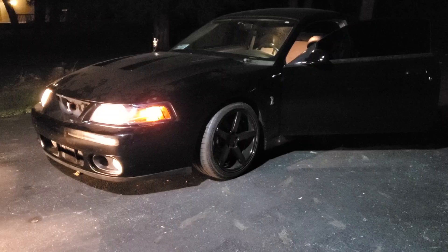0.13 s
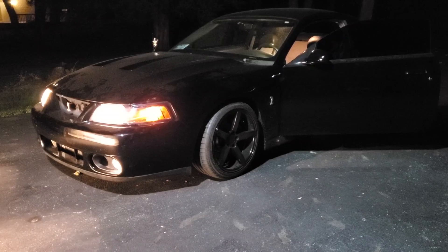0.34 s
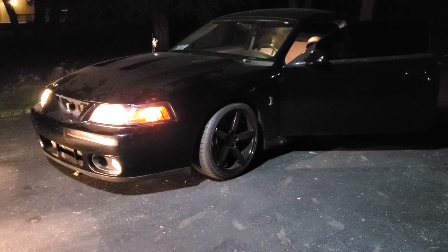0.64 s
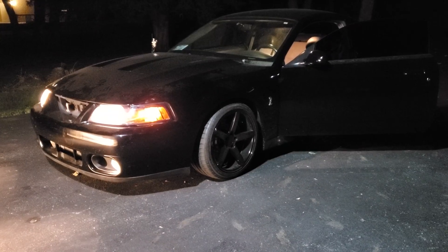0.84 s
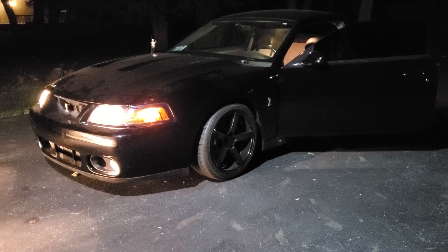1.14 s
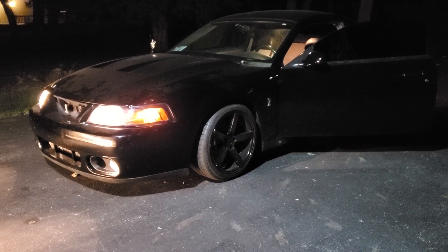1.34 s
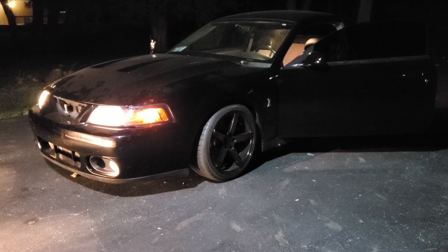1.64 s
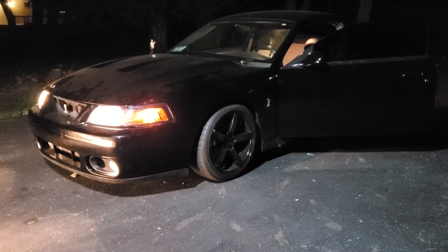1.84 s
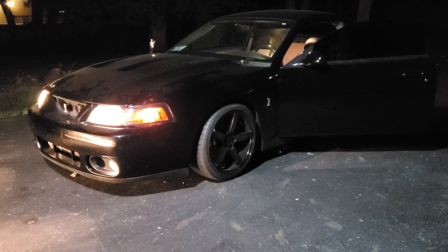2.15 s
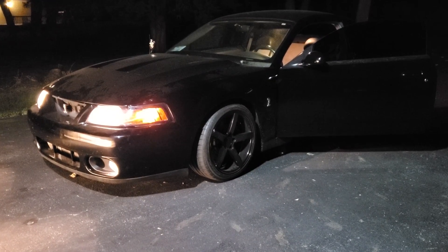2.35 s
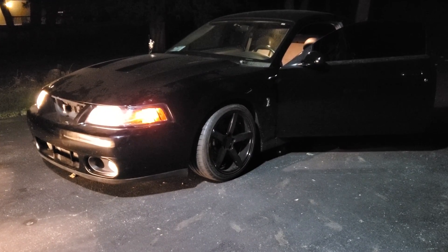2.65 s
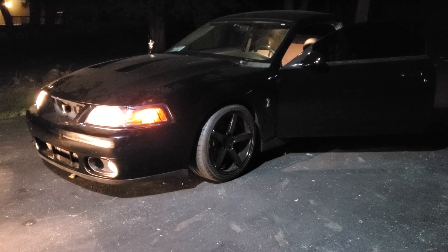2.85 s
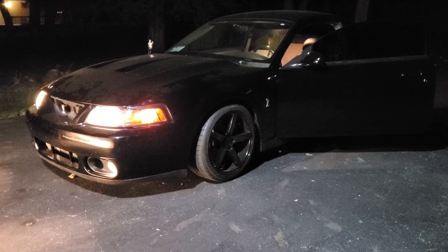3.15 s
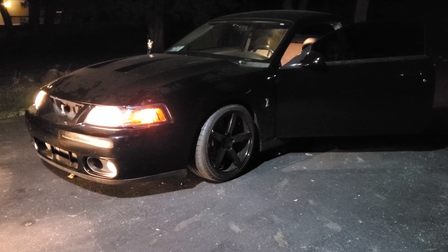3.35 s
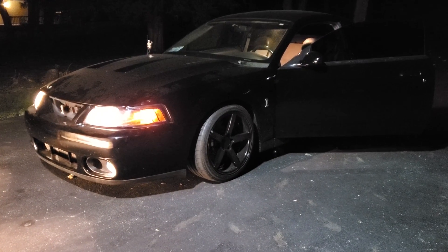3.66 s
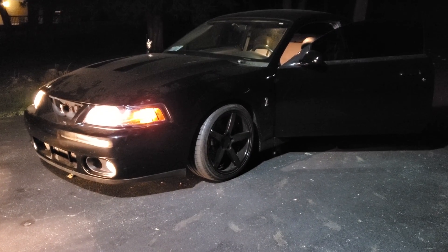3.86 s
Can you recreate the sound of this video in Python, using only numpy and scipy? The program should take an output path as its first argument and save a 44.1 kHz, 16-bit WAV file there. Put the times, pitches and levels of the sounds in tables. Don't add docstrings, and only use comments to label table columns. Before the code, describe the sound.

A car engine idles with a strong low hum, starting quiet and swelling to a steady level.

```python
import sys
import numpy as np
from scipy import signal
from scipy.fft import rfft, irfft
from scipy.io import wavfile
from scipy.ndimage import uniform_filter1d

SR = 44100
rng = np.random.default_rng(int(sys.argv[2]) if len(sys.argv) > 2 else 0)


def level_to_linear(level):
    exponent = np.asarray(level, float) / 20
    return 10 ** exponent


def master(y):
    cut = np.clip(np.atleast_2d(y).T, -1, 1)
    pcm = np.round(cut * 32767)
    wavfile.write(sys.argv[1], SR, pcm.astype(np.int16))


N = 176400
TIME_S = np.arange(N) / SR
BIN_HZ = np.arange(N // 2 + 1) * SR / N


def rms_one(x):
    return x / np.sqrt(np.mean(x ** 2) + 1e-20)


def in_time(rows):
    s, *columns = np.transpose(rows)
    return [np.interp(TIME_S, s, column) for column in columns]


def at_hz(points):
    hz, value = np.transpose(points)
    return np.interp(np.log(BIN_HZ + 1), np.log(hz), value)


def drift(rate_hz):
    pole = np.exp(-80 * np.pi * rate_hz / SR)
    draws = rng.standard_normal(N // 40 + 2002)
    slow = signal.lfilter([1], [1, -2 * pole, pole * pole], draws)[2000:]
    return np.interp(np.arange(N) / 40, np.arange(len(slow)), rms_one(slow))


def noise(gain):
    # f/Hz, correlation (0-1)
    likeness = [(60, .99), (290, 0.92), (640, 0.67), (1410, 0.43), (3100, 0.45), (6000, 0), (15000, 0.3)]
    mid, side = rfft(rng.standard_normal((2, N)))
    alike = np.clip(at_hz(likeness), 0, 1)
    shared = np.sqrt(1 + alike) * mid
    apart = np.sqrt(1 - alike) * side * [[1], [-1]]
    return rms_one(irfft(gain * (shared + apart), N))


def band(hz, width_hz, order):
    return (1 + ((BIN_HZ - hz) / (.5 * width_hz)) ** 2) ** (-.5 * order)


def closed(points):
    return level_to_linear(at_hz(points)) * (BIN_HZ > points[0][0]) * (BIN_HZ < points[-1][0])


def cycles():
    # t/s, lead/cycles
    lead = [(0, -.008), (.45, -.014), (.9, -.064), (1.05, -.058), (1.5, -.011), (1.8, .004), (2.1, .004),
            (2.5, -.005), (3.4, .003), (4, -.001)]
    cycle_hz = 7.853
    return cycle_hz * TIME_S + uniform_filter1d(*in_time(lead), size=4000)


def crickets():
    pulses_hz, near_hz, near_db = 36.9, 2885, -51
    chorus_hz, chorus_width_hz, chorus_db = 2860, 100, -48.5
    trill = np.cos(np.pi * pulses_hz * TIME_S + .25 * drift(2)) ** 2
    flips = np.pi * np.floor(pulses_hz * TIME_S + .5)
    tone = np.sin(2 * np.pi * near_hz * TIME_S + 1.2 * drift(6) + flips)
    near = level_to_linear(near_db + 2 * drift(3)) * rms_one(trill * tone)
    return near + level_to_linear(chorus_db) * noise(band(chorus_hz, chorus_width_hz, order=3))


def katydids():
    period_s, first_s, sharpness = .323, .096, 2.8
    strokes_hz, centre_hz, width_hz, level_db = 45.45, 3715, 410, -47
    throb = np.cos(np.pi * (TIME_S - first_s) / period_s) ** 2
    rasp = 1 + .55 * np.cos(2 * np.pi * strokes_hz * TIME_S + drift(3.7))
    swell = rms_one(throb ** sharpness * rasp)
    return level_to_linear(level_db) * swell * noise(band(centre_hz, width_hz, order=4))


def bay():
    # f/Hz, width/Hz, level/dB
    panels = [(503, 16, -52.5), (541, 11, -53.5), (593, 17, -48.5), (789, 21, -58), (878.5, 23, -57),
              (1178, 130, -48), (1337.5, 61, -46.5), (1415, 14, -56), (1590, 30, -53), (1613, 14, -51.5),
              (1657, 20, -52), (3340, 56, -54.5)]
    # f/Hz, density/dB per Hz
    whirr = [(30, -10), (70, -21), (165, -1), (250, -6.5), (400, -5.5), (1000, -7.5), (1800, -11.5),
             (2700, -16.5)]
    # f/Hz, density/dB per Hz
    air = [(1530, -31), (2600, -7.5), (2890, -4), (3660, -2.5), (4070, -10.5), (7140, -17), (7940, -21.5),
           (11800, -9), (16000, -26.5)]
    whirr_db, air_db = -38.5, -37
    rings = sum(level_to_linear(db) * noise(band(hz, width_hz, order=2)) for hz, width_hz, db in panels)
    machinery = rings + level_to_linear(whirr_db) * noise(closed(whirr))
    hiss = level_to_linear(air_db + .5 * drift(6.9)) * noise(closed(air))
    return machinery * level_to_linear(.55 * drift(5.7)) + hiss


def clatter():
    # f/Hz, density/dB per Hz
    colour = [(330, -6.5), (520, 4), (1000, -12), (1350, -6.5), (1650, -4.5), (1800, -17), (4500, -10)]
    level_db, loose_db, contacts = -44, 0, 48
    place = np.sort(rng.random(contacts))
    size = rng.standard_normal(contacts)
    rounds = np.arange(-1, 33)[:, None]
    at = np.interp(rounds + place, cycles(), np.arange(N), left=0, right=0).astype(int)
    clicks = np.zeros(N)
    clicks[at] = size * level_to_linear(loose_db * rng.standard_normal(at.shape))
    return level_to_linear(level_db) * rms_one(irfft(rfft(clicks) * closed(colour), N))


def puffs():
    # f/Hz, density/dB per Hz
    colour = [(400, 7), (1000, -35), (7500, -19), (9500, -11.5), (11800, -1), (13500, -11.5), (16000, -12)]
    slot_levels = [3.5, -29, -23, 5.5, -7, 7, 2.5, -15]
    level_db, start_slots, rise_s, fall_s = -43, .75, .0032, .011
    slot = np.floor(8 * cycles() - start_slots).astype(int)
    fired = np.flatnonzero(np.diff(slot)) + 1
    kicks = np.zeros(N)
    kicks[fired] = level_to_linear(np.array(slot_levels)[slot[fired] % 8] + rng.normal(0, .93, len(fired)))
    for s in (rise_s, fall_s):
        kicks = signal.lfilter([1], [1, -np.exp(-1 / (s * SR))], kicks)
    return level_to_linear(level_db) * rms_one(kicks) * noise(closed(colour))


def exhaust_hum():
    orders = {6: -40, 7: -57, 8: -43, 9: -56, 10: -52, 11: -45, 12: -55, 13: -26, 14: -23, 15: -33, 16: -41,
              24: -50, 25: -51, 26: -45, 27: -42, 29: -41, 31: -50, 32: -44, 33: -49, 35: -49, 36: -46, 37:
              -39, 39: -41, 40: -48}
    # t/s, lower/dB, upper/dB
    banks = [(.1, 3, -1), (.5, 2, 2), (.8, -8, 1), (1.1, 0.1, -4), (1.25, 5.5, -2), (1.4, 5, -3),
             (1.55, 2.5, -2), (1.9, 3, -2), (2.2, -1.5, 0.3), (2.45, 1, 0), (2.7, 0, -1.2), (2.9, 3, 0),
             (3.0, -2, -.5), (3.2, 3, 0), (3.4, -3, -2.5), (3.6, 2.5, 3.5), (3.75, 1.5, -3.5), (4, -0.5, 0)]
    crests = [(14, .615, .175), (17, -.18, 0), (27, -.16, .01), (33, -.34, 0), (37, .228, .088)]
    wander_db, wander_rad, wander_hz = .6, .06, 4
    elapsed = cycles()
    banks_db = dict(zip((13, 14), in_time(banks)))
    hum = 0
    for order, db in orders.items():
        centre, crest, delay = min(crests, key=lambda mode: abs(mode[0] - order))
        above = order - centre
        turn = order * elapsed - crest * above ** 1 - delay * above ** 2
        loose = order / 14
        level = level_to_linear(db + banks_db.get(order, 0) + wander_db * loose * drift(wander_hz))
        phase = 2 * np.pi * turn + wander_rad * loose * drift(wander_hz)
        hum = hum + np.sqrt(2) * level * np.cos(phase)
    return hum


def exhaust_breath():
    # f/Hz, width/Hz, level/dB
    pipe = [(99.3, 12, -42.5), (206, 18, -41.5), (231, 24, -43.5), (295, 40, -41), (49, 15, -45.5)]
    return sum(level_to_linear(db) * noise(band(hz, width_hz, order=2)) for hz, width_hz, db in pipe)


def scene():
    insects = crickets() + katydids()
    engine = bay() + clatter() + puffs()
    return insects + engine + exhaust_hum() + exhaust_breath()


def roll_off(x):
    return signal.sosfilt(signal.butter(12, 16110, fs=SR, output="sos"), x)


def record(dry):
    # f/Hz, level/dB
    left_level = [(110, 1.8), (290, 2), (640, 0.1), (3100, -1.5), (5500, -6), (6500, 0.2), (11600, -23.5),
                  (15800, .3)]
    # f/Hz, phase/rad
    left_lead = [(30, 0.02), (110, 0.11), (690, 0.55), (1120, 0.2), (3000, 0.046), (3700, 1.4)]
    # f/Hz, width/Hz, share removed (0-1)
    notches = [(6240, 500, .45), (8060, 150, 0.37), (2650, 91, 0.62)]
    # t/s, level/dB
    fade = [
        (0, -21),
        (.95, -19.5),
        (1.5, -6),
        (2.05, 0),
        (4, 0.8),
    ]
    start_s, open_s, top_hz = .1052, .0015, 15800
    ratio = level_to_linear(at_hz(left_level)) * np.exp(1j * at_hz(left_lead))
    right = np.sqrt(2 / (1 + np.abs(ratio) ** 2)) * (BIN_HZ < top_hz)
    for hz, width_hz, share in notches:
        right = right * (1 - np.clip(share, 0, 1) * band(hz, width_hz, order=2))
    ports = irfft(rfft(dry) * [right * ratio, right], N)
    s, db = np.transpose(fade)
    level = np.interp(TIME_S, s, level_to_linear(db))
    opening = np.clip((TIME_S - start_s) / open_s, 0, 1)
    return roll_off(ports * level * opening)


dry = scene()
out = record(dry)
master(out)
```